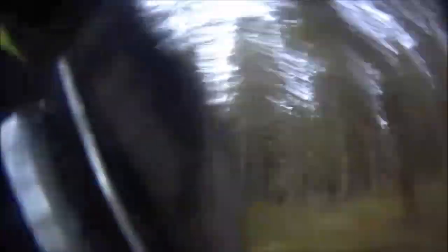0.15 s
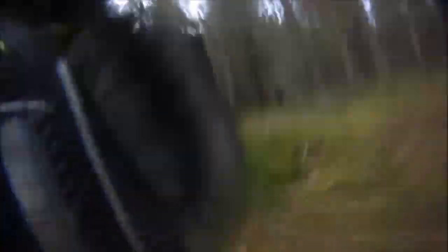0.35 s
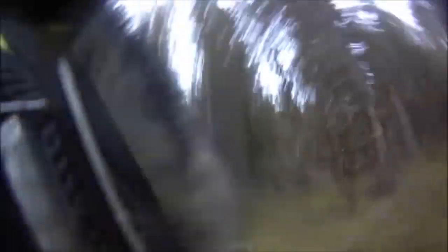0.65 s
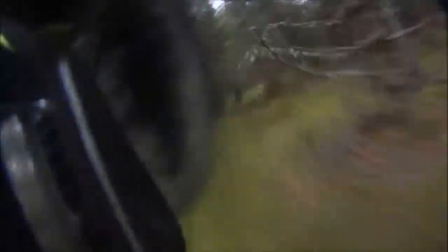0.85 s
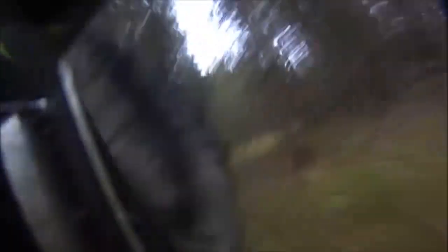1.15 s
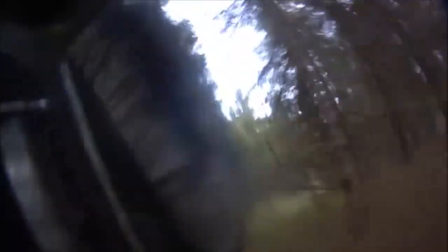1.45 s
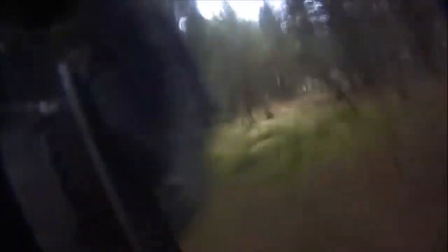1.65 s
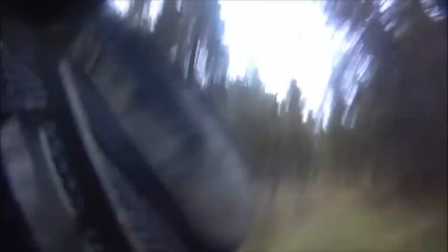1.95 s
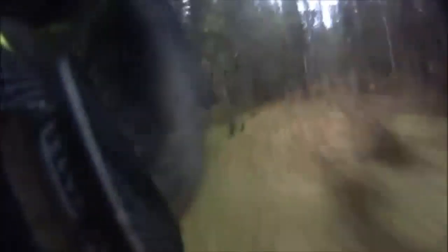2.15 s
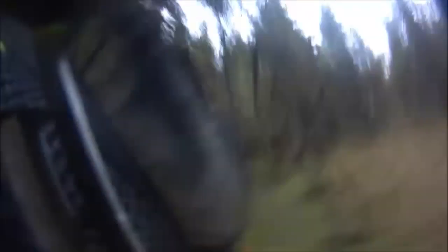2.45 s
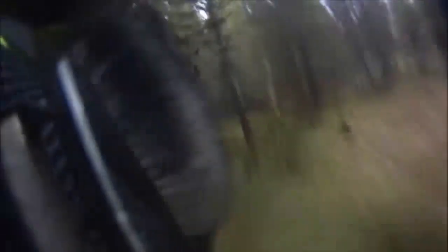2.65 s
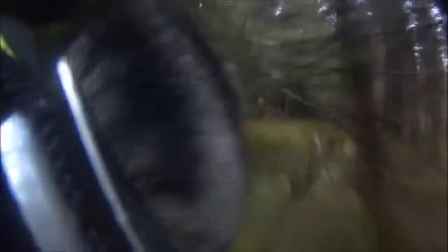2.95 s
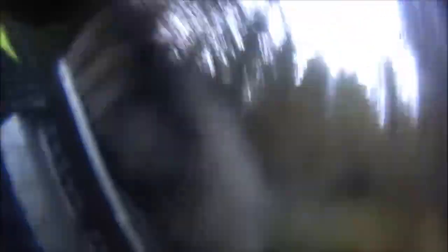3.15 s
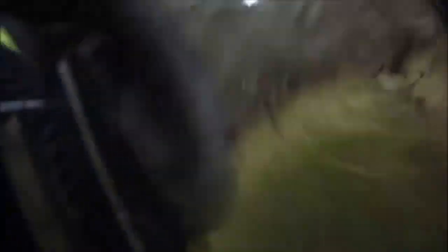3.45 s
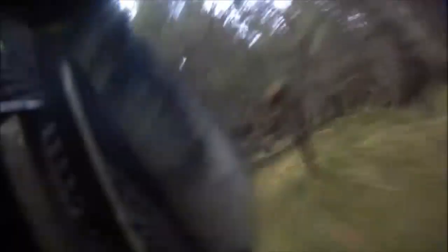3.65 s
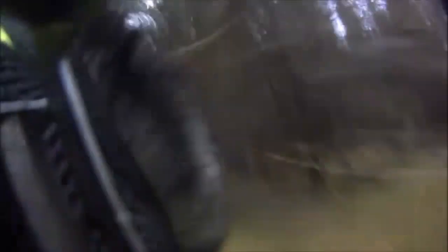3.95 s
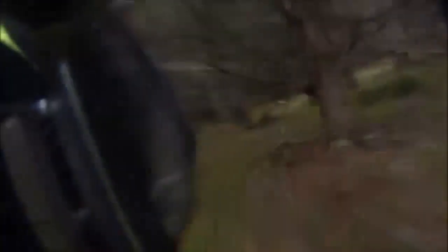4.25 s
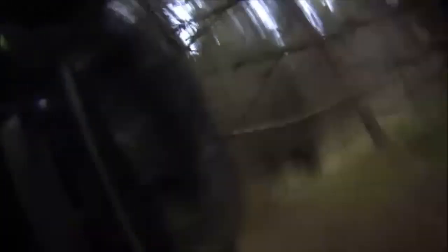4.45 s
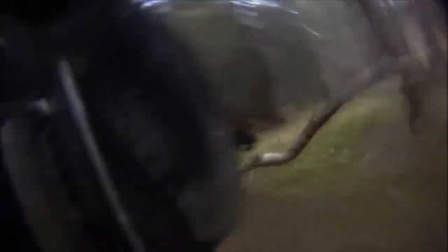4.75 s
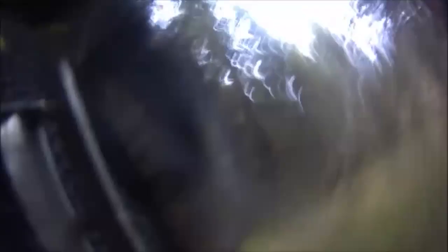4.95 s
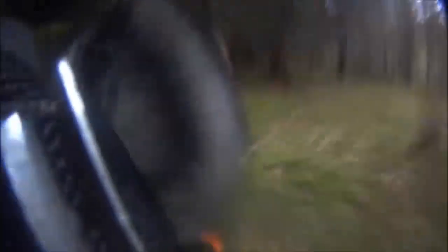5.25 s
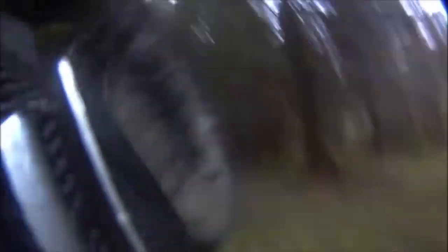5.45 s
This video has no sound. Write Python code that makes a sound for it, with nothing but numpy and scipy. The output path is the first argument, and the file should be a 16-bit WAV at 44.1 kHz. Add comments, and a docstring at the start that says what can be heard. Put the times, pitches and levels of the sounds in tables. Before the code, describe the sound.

Very close, dry housing noise from a camera on a running dog: lumpy low-mid rubbing swells and fades with the stride, a loose buckle clacks irregularly, fibres hiss, small metal parts tinkle and padding thumps. Clicks crowd together after about three seconds, a rapid cluster of loud branch cracks follows near 3.8, then the level collapses to distant-seeming rubs and little ticks until the end.

```python
"""In the woods, a dog runs with a small camera strapped to it; the one microphone hears the housing.
Air rumbles, and straps and fur rub in time with the stride: shaped noise that swells and fades.
A loose buckle clicks (short ringing tones), small metal parts tinkle, padding thumps (sliding tones).
A branch cracks across the housing in bursts of noise; after it everything is far quieter."""
import sys
import numpy as np
from scipy import signal
from scipy.fft import rfft, irfft
from scipy.io import wavfile
from scipy.ndimage import uniform_filter1d

SR = 44100
rng = np.random.default_rng(int(sys.argv[2]) if len(sys.argv) > 2 else 0)


def pcm_store(signal):
    """Save signal as 16-bit PCM."""
    levels = np.round(np.clip(np.atleast_2d(signal), -1, 1) * 32767)
    wavfile.write(sys.argv[1], SR, levels.astype(np.int16).T)


N = 247401


def gain_of(db):
    """Turn decibels into an amplitude factor."""
    return 10 ** (np.asarray(db) / 20)


def evened(x):
    """Scale to an average (RMS) level of 1."""
    return x / np.sqrt(np.mean(x ** 2) + 1e-20)


def read(points, hz):
    """Read a (frequency, value) table between its points, on a log frequency scale."""
    f, value = np.transpose(points)
    return np.interp(np.log(hz + 1), np.log(f + 1), value)


def add(mix, s, sound):
    """Add a sound into mix, in place, starting at s seconds."""
    part = mix[round(s * SR):][:len(sound)]
    part += sound[:len(part)]


def peaked(db, x):
    """Scale so that the peak is at db."""
    return gain_of(db) * x / np.max(abs(x))


def noise(field_db, size, flicker_db, patchy_db):
    """Random short-time spectra under field_db(Hz, s), with flicker shared by all bins and small patches."""
    hop = size // 4
    frames = N // hop + 5
    hz = np.fft.rfftfreq(size, 1 / SR)[:, None]
    real, imaginary, patches = rng.standard_normal((frames, len(hz), 3)).T
    patches = uniform_filter1d(patches, size=5, axis=0)
    patches = evened(uniform_filter1d(patches, size=5, axis=1))
    flicker = evened(uniform_filter1d(rng.standard_normal(frames), size=3))
    shape = gain_of(field_db(hz, np.arange(frames) * hop / SR))
    shape = shape / np.sqrt(np.sum(shape ** 2, axis=0))
    smoother_bass = hz / (hz + 120.)
    rough = gain_of((flicker_db * flicker + patchy_db * patches) * smoother_bass)
    spectra = (real + 1j * imaginary) * rough * shape
    return evened(signal.istft(spectra, nperseg=size, noverlap=size - hop)[1][:N])


# air buffeting the microphone, level over time: (t/s, level/dB)
RUMBLE = [(0, -53.5), (3.8, -49), (3.941, -78), (4.2, -95), (5.61, -85.5)]
# its tone colour: (f/Hz, level/dB per Hz)
RUMBLE_COLOUR = [(10, -10.5), (25, -6), (60, 1.5), (110, -1), (200, -22), (400, -50), (1000, -87.5)]


def rumble():
    """Air pushes unevenly on the microphone: deep noise with strong flicker and a changing level."""
    level_db = np.interp(np.arange(N) / SR, *np.transpose(RUMBLE))

    def colour_db(hz, at):
        return read(RUMBLE_COLOUR, hz) + 0 * at
    return gain_of(level_db) * noise(colour_db, size=512, flicker_db=7.0, patchy_db=9.0)


# tone colour of the microphone's own steady noise: (f/Hz, level/dB per Hz)
SELF_NOISE = [(12, -28), (20, 2.5), (79, -11), (168, -6), (780, -9), (1060, -5), (1910, -17.5),
              (6180, -22.5), (16000, -35.5)]
SELF_NOISE_DB = -79


def self_noise():
    """The microphone makes a smooth faint noise, heard only in the quiet."""
    def colour_db(hz, at):
        return read(SELF_NOISE, hz) + 0 * at
    return gain_of(SELF_NOISE_DB) * noise(colour_db, size=1024, flicker_db=0.6, patchy_db=0.7)


# strokes of straps and fur over the housing, about two a stride: (t/s of the peak, length/s,
# drag level/dB, centre of the drag f/Hz, emphasis at the centre level/dB,
# harshness in the upper tones level/dB, hiss of fibres level/dB)
STROKES = [(.01, .06, -39.5, 760, 10, 8, -43.5), (0.089, 0.15, -27, 556, 7, 0, -46),
           (.24, 0.19, -28, 720, 16, 7, -45.5), (.49, .12, -30.5, 397.6, 1.5, 2.5, -48),
           (.66, .15, -27.5, 620, 8, 2.5, -46), (0.899, 0.3, -30.5, 556, 4.5, 0, -52),
           (1.058, .15, -24, 800, 10.5, 0, -43.5), (1.31, .18, -28, 375, 10, 2.5, -54),
           (1.50, 0.18, -27, 600, 10, 0.5, -48.5), (1.76, .2, -26, 430, 5.5, -3, -75),
           (1.97, 0.047, -38, 420, 3.5, -2, -50), (2.068, 0.07, -22, 905, 18, 4.5, -66),
           (2.117, 0.068, -28.5, 815, 9.5, 7, -55), (2.27, 0.27, -28, 375, 4.5, -2, -57),
           (2.43, 0.25, -35.5, 624, 8, 1.5, -55), (2.699, 0.25, -26, 470, 9, 1.5, -56),
           (2.85, 0.18, -26.5, 530, 11, 5, -44), (3.08, 0.07, -29.5, 440, 10.5, 1, -72),
           (3.23, 0.36, -27, 424, 14.5, 5.5, -49), (3.43, 0.18, -33.5, 510, 7, 9.5, -43.5),
           (3.53, 0.11, -30.5, 550, 6, 3.5, -66), (3.66, 0.15, -28, 450, 9.5, 3.5, -47),
           (4.05, .2, -62, 750, 14, -0.5, -83), (4.34, 0.14, -58.5, 653, 11.5, 5, -75.5),
           (4.494, .12, -60, 843, 9.5, 2.5, -71.5), (4.62, .08, -63.5, 400, 9, 2, -78),
           (4.76, 0.097, -65, 1100, 11.5, 2, -67), (4.93, 0.12, -65.5, 550, 6, 2, -73.5),
           (5.14, 0.24, -60.5, 718, 8.5, 2.5, -75), (5.258, .06, -68.5, 500, 8, 1, -86),
           (5.49, .16, -59.5, 602, 6.5, -0.5, -78)]
# what is left between strokes; it drops away after the branch: (t/s, drag level/dB, hiss level/dB)
REST = [(0, -39, -61), (.4, -40, -52.5), (1.4, -40, -56.5), (2.1, -33.5, -50.5), (2.55, -44.5, -56.5),
        (3.0, -34, -56), (3.76, -38, -52), (3.87, -47.5, -61), (3.94, -62, -73), (4.25, -67.5, -85),
        (4.85, -74.5, -83), (5.33, -85, -96.5), (5.61, -67.5, -89)]
REST_EMPHASIS_DB, REST_HZ, REST_HARSH_DB = 8, 416.7, 1
RISE_SHARE = 0.49  # part of a stroke's length spent swelling


def strokes():
    """Strokes swell and fade over the rest: drag power, hiss power, drag centre (Hz), emphasis, harshness."""
    t = np.arange(N) / SR
    at, rest_db, rest_hiss_db = np.transpose(REST)
    drag = gain_of(2 * np.interp(t, at, rest_db))  # twice the dB gives power
    fibres = gain_of(2 * np.interp(t, at, rest_hiss_db))
    # overlapping strokes share their colour in proportion to power
    colour = drag * np.c_[[np.log(REST_HZ), REST_EMPHASIS_DB, REST_HARSH_DB]]
    for s, length, drag_db, hz, emphasis_db, harsh_db, hiss_db in STROKES:
        side_s = length * np.where(t < s, RISE_SHARE, 1 - RISE_SHARE)
        swell = np.exp(-(2 * (t - s) / side_s) ** 2)
        part = gain_of(2 * drag_db) * swell
        drag = drag + part
        fibres = fibres + gain_of(2 * hiss_db) * swell
        colour = colour + part * np.c_[[np.log(hz), emphasis_db, harsh_db]]
    log_centre, emphasis_db, harsh_db = colour / drag
    return drag, fibres, np.exp(log_centre), emphasis_db, harsh_db


# basic tone colour of the drag: (f/Hz, level/dB per Hz)
RUB_COLOUR = [(15, -53), (30, -29.5), (90, -16.5), (200, 0.5), (400, -7), (800, -10), (1400, -12),
              (2000, -24), (3000, -37), (4500, -49), (8000, -89)]


def rub():
    """Straps and fur drag over the housing: low lumpy noise whose colour changes from stroke to stroke."""
    power, _, centre_hz, emphasis_db, harsh_db = strokes()
    width_octaves = .9

    def drag_db(hz, at):
        here = np.minimum(np.round(at * SR).astype(int), N - 1)
        hump = np.exp(-(np.log2((hz + 1) / centre_hz[here]) / width_octaves) ** 2)
        upper = np.clip(np.log2((hz + 1) / 720.0), 0, 1)
        return read(RUB_COLOUR, hz) + emphasis_db[here] * hump + harsh_db[here] * upper
    return np.sqrt(power) * noise(drag_db, size=512, flicker_db=3.5, patchy_db=2.5)


SHAKE_DB, SHAKE_T60_S = -45.5, 0.53  # level against the click, time to fade by 60 dB


def shaken():
    """Each listed click shakes the fibres, which hiss on briefly: the hiss power it leaves behind."""
    out, t = np.zeros(N), np.arange(8000) / SR
    for s, peak_db, *_ in CLICKS:
        add(out, s, gain_of(2 * (peak_db + SHAKE_DB - 60 * t / SHAKE_T60_S)))
    return out


# tone colour of the hissing fibres: (f/Hz, level/dB per Hz)
HISS_COLOUR = [(900, -31), (1800, -6.5), (2700, -6), (3700, -17.5), (4400, -17), (4900, -13), (5500, -14.5),
               (6300, -16.5), (8200, -26.5), (11000, -34), (14700, -42), (16000, -56)]
# ringing of small metal parts before detuning: (f/Hz, relative level/dB, t/s to fade by 60 dB)
TINKLE = [(2294, 8, 0.003), (4070, -1.5, 0.003), (5900, 3, 0.03), (5760, 2.5, 0.036), (7500, -3, 0.0072)]


def hiss():
    """Fibres hiss finely while random ticks set small metal parts of the harness ringing."""
    def colour_db(hz, at):
        return read(HISS_COLOUR, hz) + 0 * at
    fibres = noise(colour_db, size=128, flicker_db=-1.5, patchy_db=5.5)
    parts = np.repeat(TINKLE, 3, axis=0)  # three parts of each size, none tuned alike
    chance, size, *moved = rng.random((N, 2 + len(parts))).T
    ticks = gain_of(-3. * np.log(size + .003)) * (chance < 60 / SR)  # about 60 a second
    t, tinkle = np.arange(1000) / SR, np.zeros(N)
    for (hz, db, t60), share in zip(parts, moved):
        tone = np.sin(2 * np.pi * hz * rng.uniform(.95, 1.05) * t)
        ring = gain_of(db - 60 * t / t60) * tone * (1 - np.exp(-t / .0006))
        tinkle += signal.oaconvolve(ticks * share ** 3, ring)[:N]  # the cube: few parts move much
    power = strokes()[1] + shaken()
    return np.sqrt(power) * (fibres + gain_of(-11.5) * evened(tinkle))


FAINT_CLICKS = 45
FAINT_OVER_HISS_DB, FAINT_LOW_DB, FAINT_HIGH_DB, FAINT_REBOUND_DB, FAINT_SPREAD_DB = 16.5, 18, 13.5, -14, 5


def faint_clicks():
    """The buckle also ticks faintly at random moments, its level following the hiss of the strokes."""
    s = rng.uniform(0, N / SR, FAINT_CLICKS)
    hiss_db = 10 * np.log10(strokes()[1][(s * SR).astype(int)])
    colour_db = np.ones((3, len(s))) * [[FAINT_LOW_DB], [FAINT_HIGH_DB], [FAINT_REBOUND_DB]]
    usual = np.transpose([hiss_db + FAINT_OVER_HISS_DB, *colour_db])
    return np.c_[s + .001, usual + FAINT_SPREAD_DB * rng.standard_normal(usual.shape)]


# the louder buckle clicks: (t/s, typical peak level/dB, low modes level/dB, high modes level/dB,
# rebound level/dB)
CLICKS = [(0.0684, -4, 7.5, 15, 2.5), (0.1695, -21.5, 15, 5, -14), (0.205, -29, -7, 24, -6),
          (0.2102, -16, 17.5, 6, -23), (0.239, -15.5, 5, 9.5, -2), (0.259, -16, 10, -6, -9),
          (0.5864, -24.5, 29, 30, 6), (0.6767, -18, 28, 7, -3), (0.6972, -25, -1, 17, -5),
          (0.815, -12, 8, 3, -4), (0.874, -30.5, -5, 22, -9), (0.8963, -7.5, 7, 8, -4),
          (1.0114, -30, -8, 19, -13), (1.0448, -18, 17, 8, -12), (1.091, -29.5, -15, 12, -6),
          (1.3292, -29, 18, 22, -5), (1.361, -36, 10, 8, -24), (1.441, -5, -0.5, 9.5, -6),
          (1.4704, -23.5, 0, 20, 2), (1.513, -22.5, 6, 10, -1), (1.8288, -22.5, 17.5, -8, -23),
          (1.8976, -34, -7, 24, -2), (1.91, -23, 12, 7, -3), (1.9623, -30, -14, 17.5, -10),
          (1.986, -16.5, 11, 8, -5), (2.007, -25, -2, 16, -22), (2.1154, -23.5, 19.5, 19.5, -11),
          (2.3544, -3.5, 2.5, 9.5, -3.5), (2.4015, -19, 10, 8, -9), (2.4384, -19, 19, 8, -5),
          (2.732, -32.5, -2, 23, -1), (2.78, -13, 6, 2, -15), (2.7967, -15, 9, 5, -5),
          (2.8586, -27.5, 2, 17, 2), (2.8961, -26.5, 0, 19, -6), (2.967, -20.5, 16, 22, -10),
          (2.9764, -10.5, 6.5, 3, -12), (2.9965, -33, -7, 14, -17), (3.016, 1, 1.5, 10, -5),
          (3.055, -8, 4, 11, -25), (3.092, -14.5, 6.5, 3, -23), (3.301, -20, 14.5, 24, -28),
          (3.392, -27, 10, -8, -16), (3.454, -24, -14, 18.5, 5), (3.4683, -3.5, 0.5, 3, -6),
          (3.5173, -14.5, -3, 11, -10), (3.5533, -4, 0, 1, -5), (3.5902, -11.5, 21, 18, -12),
          (3.6335, -19, 10, 3, -20), (3.6467, -14.5, 9.5, 5, -8), (4.0262, -46.5, 3.5, -5, -4.5),
          (4.079, -58.5, 6, -4, -3.5), (4.121, -49, 13, -16, -15), (4.2381, -58.5, 8, 0, -8),
          (4.3157, -55.5, 12.5, 22, -9), (4.3784, -34.5, 3, 10.5, -14), (4.4624, -42.5, 24, 28, -11.5),
          (4.5102, -43, -4, 11, -12), (4.5293, -41.5, 18, 0, -18), (4.587, -52, 25, -4, -8),
          (4.6413, -40, 5, 3, -13.5), (4.7268, -36, 4, 6, -3), (4.7553, -38, 2.5, 4, -9),
          (4.799, -53, 21.5, -3, 0), (4.9126, -48, 11.5, 22.5, -17.5), (5.023, -49, 10, -5, -9),
          (5.0558, -46, 25, -7, -15), (5.079, -62, -4, 7, -4), (5.1096, -38, 1, 1, -4),
          (5.1512, -54, 18, 18, -3), (5.1794, -60.5, -2, 7, -5.5), (5.494, -38.5, 3, 3, -5),
          (5.519, -58, -5.5, -2, -5), (5.55, -45.5, 11, 14.5, -1), (5.601, -52.5, 13.5, -3, -2.5)]
# the housing's ringing tones (modes): (f/Hz, level/dB, longest t/s to fade by 60 dB)
HOUSING = [(630, -7, 0.007), (908, -9.5, 0.015), (1218, -15, 0.032), (1542, -13.5, 0.024),
           (2163, -9, 0.018), (2375, -6, 0.011), (2707, -2.5, 0.0099), (3205, -17.5, 0.024),
           (3550, -5, 0.0078), (3730, -17, 0.039), (4361, 6, 0.0072), (5154, -5.5, 0.0078),
           (5760, -15, 0.0081), (6300, -21.5, 0.0097), (7490, -9.5, 0.0036), (8720, -26, 0.021),
           (11400, -46, 0.0089), (14800, -37, .008)]
# bright snap of contact: level at a full blow, extra fall in dB per dB for softer blows, fade time
SNAP_DB, SNAP_SLOPE, SNAP_T60_S = -29.5, .8, 0.018


def clicks():
    """Each buckle click rings the housing, high modes first, with one rebound and a fading chatter."""
    hz, db, t60 = np.transpose(HOUSING)[:, :, None]
    t, out = np.arange(2000) / SR, np.zeros(N)
    t60 = np.minimum(t60, 55 / hz)  # plastic loses a like share of energy each cycle
    spread_db, contact_s, detune, chatter_t60 = 1.5, .0011, .015, .03
    low = np.clip(np.log2(3500 / hz), 0, 1)
    high = np.clip(np.log2(hz / 4600) * 3, 0, 1)
    rise = 1 - np.exp(-(t / (contact_s + 0.5 / hz)) ** 2)  # low modes take longer to build up
    for s, peak_db, low_db, high_db, rebound_db in [*CLICKS, *faint_clicks()]:
        # two blows, each on a slightly other spot
        spot, phase, grip = rng.standard_normal((3, 2, len(hz), 1))
        level_db = db + low_db * low + high_db * high + spread_db * spot
        tones = np.sin(2 * np.pi * hz * (1 + detune * grip) * t + 3. * phase)
        first, second = (gain_of(level_db - 60 * t / t60) * rise * tones).sum(axis=1)
        chatter = rng.standard_normal(len(t)) * gain_of(-26.5 - 60 * t / chatter_t60)
        add(first, 0, signal.fftconvolve(chatter, second)[:len(t)])
        add(first, .0038, gain_of(rebound_db) * second)
        crest = 3.9 * np.sqrt(np.mean(first[:300] ** 2))  # typical peak of the first few milliseconds
        snap = np.diff(rng.standard_normal(len(t) + 1))  # differences make the noise bright
        snap = snap * (1 - np.exp(-t / contact_s)) * gain_of(-60 * t / SNAP_T60_S)
        snap = snap * gain_of(SNAP_DB + SNAP_SLOPE * np.clip(peak_db, -20, 0))
        add(out, s - .0008, gain_of(peak_db) * (first / crest + snap))
    return out


# dull thumps of padding on the housing: (t/s of the peak, level/dB, pitch at the peak f/Hz,
# fall after it in octaves, t/ms to fade by 60 dB)
THUMPS = [(0.071, -25, 1190, 0.0, 20), (0.1, -16.5, 840, 0.2, 15), (0.17, -13.5, 1230, 0.38, 4.7),
          (0.5377, -21.5, 597, 0.68, 30), (1.263, -23.5, 824, 0.39, 41), (1.2973, -20.5, 458, 1.17, 30),
          (1.5958, -21, 548, 0.94, 20), (1.8854, -23, 385, 0.31, 6.2), (1.8996, -17.5, 680, 0, 12),
          (1.941, -29, 565, 0.5, 9), (2.0266, -20.5, 565, 0.18, 40), (2.2127, -19, 790, 1, 14),
          (2.3281, -16, 580, 1.2, 22), (2.626, -20, 620, 0.98, 14), (3.1291, -21, 1680, 0.53, 6.3),
          (3.2855, -13.5, 702, 0.43, 13), (3.2879, -8, 846, 0.051, 18), (3.4559, -23, 300, 0.18, 9.3),
          (3.6218, -6.5, 1087, 1.34, 9), (3.7867, -8.5, 615, 0.76, 16), (3.8154, -9, 1502, 0.57, 19),
          (3.9006, -2.5, 916, 0.24, 9), (4.335, -36, 773, 1.18, 8.7), (4.5298, -57, 787, 0.31, 14),
          (4.5598, -50.5, 1100, 0.7, 24), (4.9805, -43.5, 864, 1.7, 21.3), (5.058, -44, 966, 0.19, 25),
          (5.1311, -32.5, 1019, 0.96, 14.5), (5.2192, -46.5, 777, 0, 15.3)]


def thumps():
    """A blow sends a bending wave through the padding: high tones arrive first, so the pitch slides down."""
    t, out = np.arange(2500) / SR - .003, np.zeros(N)  # the peak is at t = 0
    # the whole housing sways after
    sway = np.sin(2 * np.pi * 290. * t) * (1 - np.exp(-(np.maximum(t, 0) / 0.0012) ** 2))
    body = gain_of(-6.5) * sway * gain_of(-60 * t / 0.023)
    for s, peak_db, hz, fall, t60_ms in THUMPS:
        pitch_hz = hz * 2 ** (-fall * np.tanh(t / 0.001))
        cycles = np.cos(2 * np.pi * (np.cumsum(pitch_hz) / SR + rng.random()))
        swell = np.where(t < 0, np.exp(-(t * hz / 0.72) ** 2), gain_of(-60e3 * t / t60_ms))
        add(out, s + t[0], gain_of(peak_db) * (cycles * swell + body))
    return out


# the branch cracking across the housing: (t/s of the start, level/dB before the 13.5 dB cut below,
# tilt in dB per octave, t/ms to fade by 60 dB)
CRACKS = [(3.77, -14.5, -9, 39), (3.785, -6.5, -7, 60), (3.797, -6.5, -10.5, 57), (3.808, -4.5, 2.5, 36),
          (3.8133, 11.5, -3.5, 26), (3.822, 9, 0, 34), (3.83, -1.5, -0.5, 25), (3.838, 0, 0, 16),
          (3.8408, 6, 0, 20), (3.851, -13, -6, 32), (3.869, -17.5, -1.5, 100), (3.883, -7.5, 0.5, 40),
          (3.8942, -2, 0, 35), (3.8981, 5.5, -4, 20), (3.9066, -8, -1, 33), (3.929, -34, 0.5, 51)]
# tone colour of the cracks before tilting: (f/Hz, level/dB per Hz)
CRACK_COLOUR = [(35, -37), (60, -31.5), (301, -21.5), (566, -8.5), (1740, -1), (2250, -7.5), (2710, -7),
                (4750, -12.5), (5590, -8.5), (7570, -16.5), (12400, -36), (14600, -41.5), (16000, -43)]
CRACK_RISE_MS = .7


def branch():
    """The branch splinters: every crack is a sharp burst of noise with its own tilt."""
    t, hz, out = np.arange(4096) / SR, np.fft.rfftfreq(4096, 1 / SR), np.zeros(N)
    for s, peak_db, tilt_db, t60_ms in CRACKS:
        octaves = np.log2(np.clip(hz, 300, 7000) / 2000)
        colour = gain_of(read(CRACK_COLOUR, hz) + tilt_db * octaves)
        burst = evened(irfft(rfft(rng.standard_normal(4096)) * colour))
        swell = (1 - np.exp(-(1e3 * t / CRACK_RISE_MS) ** 2)) * gain_of(-60e3 * t / t60_ms)
        add(out, s, gain_of(peak_db) * burst * peaked(-13.5, swell))
    return out


def scene():
    """Add all the sounds, the same in both channels."""
    mono = rumble() + self_noise() + rub() + hiss() + clicks() + thumps() + branch()
    return np.tile(mono, (2, 1))


# faint random noise, opposite in the two channels, strongest in the treble, # against the mono sound: (f/Hz,
# level/dB)
SIDE_COLOUR = [(60, -36), (250, -50.5), (550, -56), (1400, -55.5), (2800, -48.5), (5600, -37),
               (10000, -18.5), (15000, -20)]
EDGE_HZ = 16300  # upper band limit


def record(dry):
    """Deep bass is dropped, the input clips, faint opposite noise makes the two channels differ slightly; then
    the band limit."""
    mono = signal.lfilter(*signal.butter(2, 50., "high", fs=SR), dry[0])
    mono = np.clip(mono, -1, 1)
    hz, _, spectra = signal.stft(mono, SR, nperseg=1024)
    random_phase = np.exp(2j * np.pi * rng.random(spectra.shape))
    side_gain = gain_of(read(SIDE_COLOUR, hz))[:, None]
    side = signal.istft(spectra * side_gain * random_phase, SR, nperseg=1024)[1][:N]
    pair = np.array([mono + side, mono - side])
    low_pass = signal.firwin(511, EDGE_HZ, window=("kaiser", 11), fs=SR)
    return signal.oaconvolve(pair, low_pass[None], "same")


dry = scene()
out = record(dry)
pcm_store(out)
```